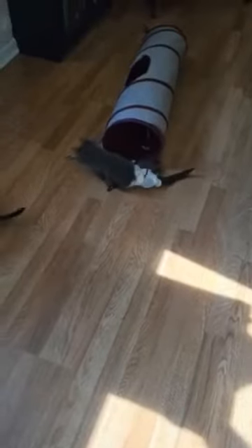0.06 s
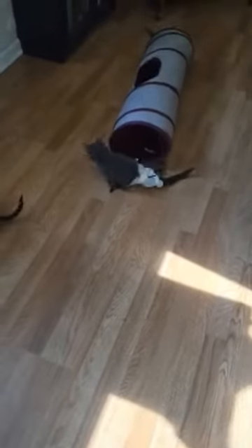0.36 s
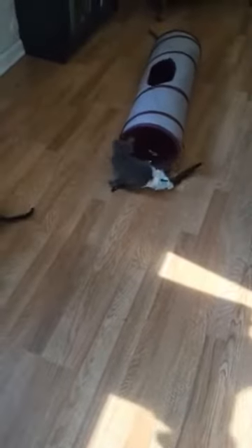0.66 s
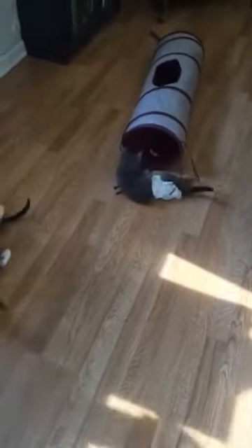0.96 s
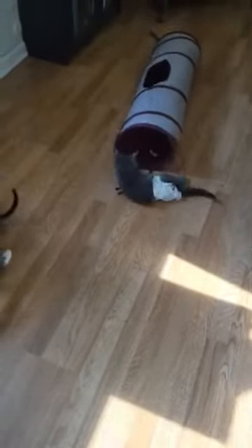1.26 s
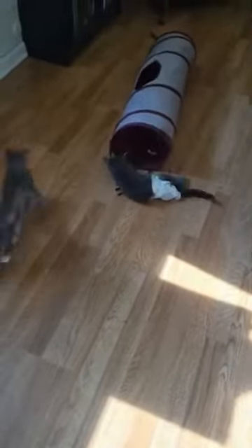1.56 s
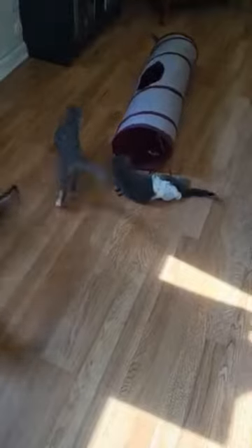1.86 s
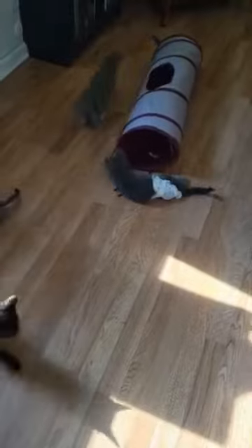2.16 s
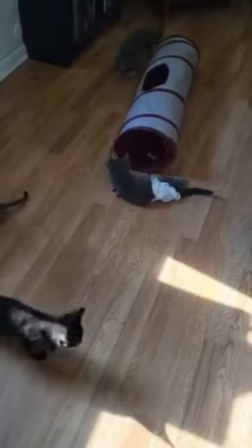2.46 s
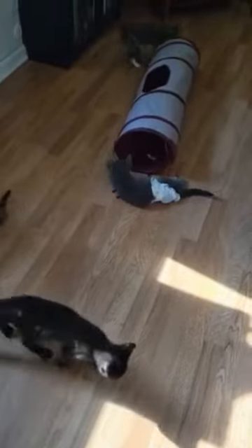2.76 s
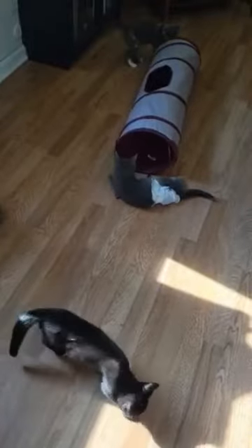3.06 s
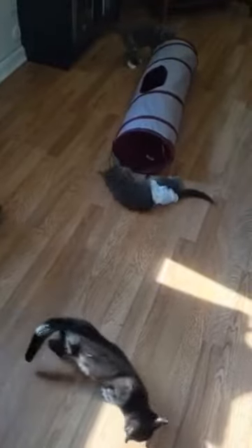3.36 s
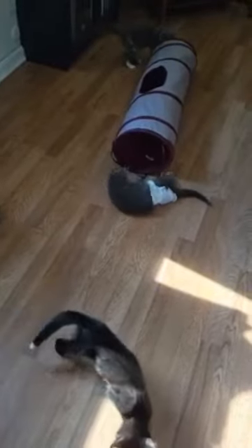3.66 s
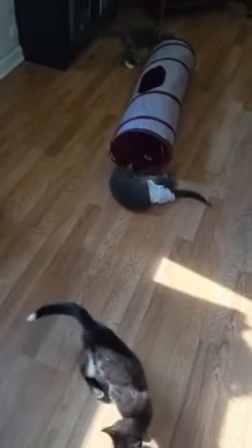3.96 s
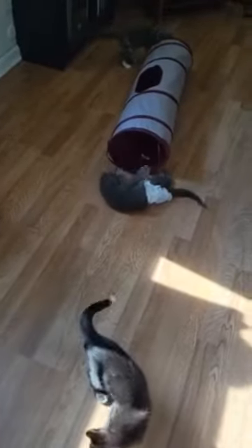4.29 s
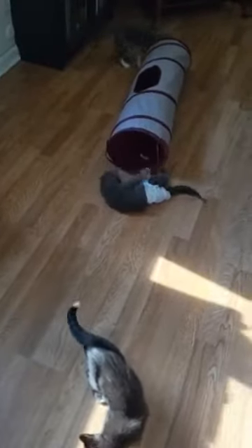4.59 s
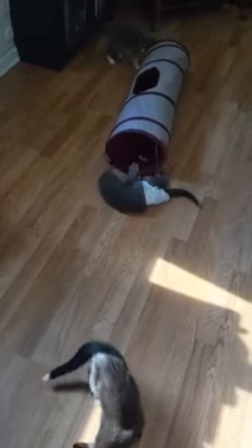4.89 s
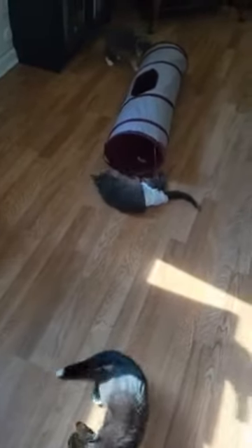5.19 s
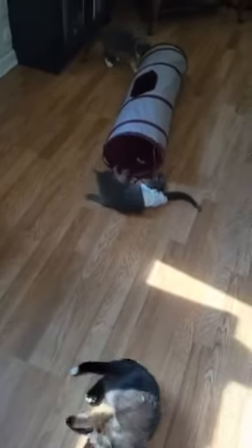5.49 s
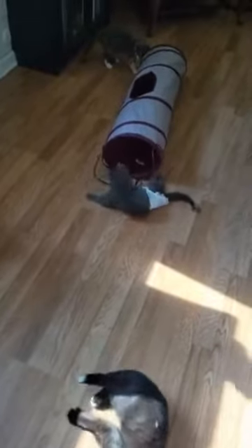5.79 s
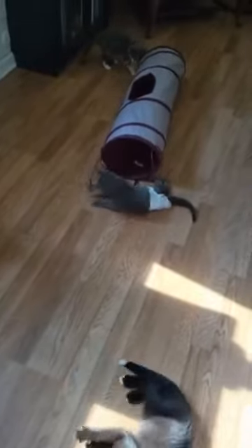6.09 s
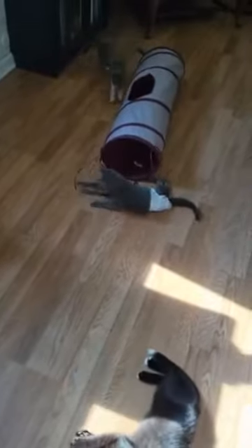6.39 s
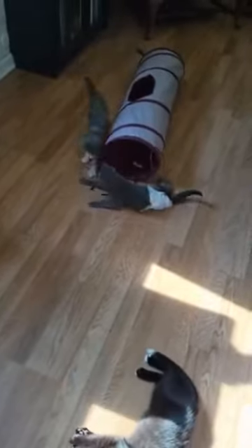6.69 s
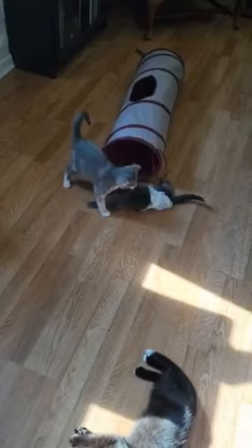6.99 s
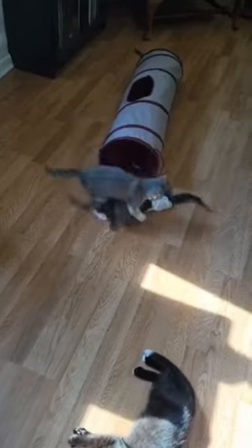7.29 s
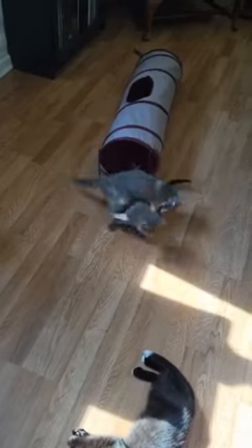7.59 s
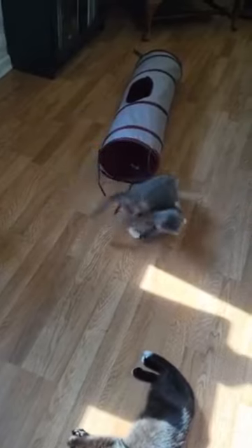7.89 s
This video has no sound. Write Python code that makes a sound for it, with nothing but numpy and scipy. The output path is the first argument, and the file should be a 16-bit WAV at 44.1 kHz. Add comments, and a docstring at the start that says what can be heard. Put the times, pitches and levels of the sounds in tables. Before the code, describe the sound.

Kittens play on a bare wooden floor beside a fabric tunnel, heard close through a phone in a quiet living room. It opens with a faint rustle and a few light taps. From about 0.8 to 1.8 seconds, paws scamper in a cluster of hollow thumps, with a brief deep rumble at 1 second and the loudest knock near 1.3. Softer, scattered steps follow, with one firmer thud just after 3 seconds. From about 3.5 to 6 seconds, small sharp claw ticks and short scrapes of fur and fabric take over, busiest around 5 seconds. Paw thumps return at 6.2 and build into a pattering scuffle from 6.5 to 7.5, with a crisp claw snap near 6.7 and more scratching, then ease to faint rustling by 8 seconds. Each contact has a short room reverberation, over a faint steady hum and hiss.

```python
"""A faint rustle, then small paws on bare boards: kittens at play beside a fabric tunnel in a quiet
living room, close to a hand-held phone. Toes tap and ring the wooden floor and the body's weight follows
with a thump. Claws drag and snap free; fur and fabric scrape in tiny catches of friction.
The room answers the contacts briefly, over a low steady hum and hiss."""
import sys
import numpy as np
from scipy import signal
from scipy.fft import rfft, irfft, next_fast_len
from scipy.io import wavfile
from scipy.ndimage import map_coordinates

SR = 44100
rng = np.random.default_rng(int(sys.argv[2]) if len(sys.argv) > 2 else 0)


def wrap_up_sound(samples):
    """Save the sound to the file named by the first command line argument, as 16-bit audio."""
    columns = np.atleast_2d(samples).T
    # keep every value between -1 and 1, then stretch to whole-number steps
    tamed = np.clip(columns, -1, 1)
    steps = np.round(tamed * 32767).astype(np.int16)
    wavfile.write(sys.argv[1], SR, steps)


N = 350506
SPAN = 24000  # samples given to one contact and its decay
AGE = np.arange(SPAN) / SR
TOP_HZ = 13800  # the phone's band limit

# The colour of rubbed fur and fabric. Each row: frequency in Hz, gain in dB.
FUR_COLOUR = [(150, 13), (500, 11.5), (1200, -0.5), (2000, 2.5), (2600, -0.5), (3600, 0), (5000, -1.5),
              (6800, 1), (8200, -14), (10000, -26), (12500, -15), (14000, -60)]
# The body, middle and air of a tick or scrape. Each row: lower and upper edge in Hz.
TREBLE_BANDS = [(700, 2800), (2800, 8000), (8000, 12500)]


def amp(db):
    return 10 ** (np.asarray(db) / 20)


def unit(x):
    return x / np.sqrt(np.mean(x ** 2) + 1e-20)


def freqs(x):
    return np.fft.rfftfreq(x.shape[-1], 1 / SR)


def along(points, hz):
    """Read a curve of (Hz, value) points on a log frequency axis."""
    knots_hz, values = np.transpose(points)
    return np.interp(np.log(hz + 1), np.log(knots_hz + 1), values)


def coloured(x, points):
    """Causal filter with the gain of (Hz, dB) points."""
    n = x.shape[-1]
    cepstrum = irfft(np.log(amp(along(points, freqs(x)))), n)
    cepstrum[1:n // 2] *= 2
    cepstrum[n // 2 + 1:] = 0
    return irfft(rfft(x) * np.exp(rfft(cepstrum)), n)


def wobble(rate):
    """A smooth random curve, rate knots a second."""
    return map_coordinates(rng.standard_normal(int(N * rate / SR) + 4), [np.arange(N) * rate / SR])


def add(track, start, sound):
    part = track[:, max(round(start * SR), 0):][:, :SPAN]
    part += sound[:, :part.shape[1]]


def diffuse(pair, null_hz=1150, likeness=0.84):
    """Sound from all sides: alike at the two microphones only in the bass."""
    turn = np.arccos(np.clip(likeness, 0, 1) * np.sinc(freqs(pair) / null_hz)) / 2
    mid, side = irfft(rfft(pair) * [np.cos(turn), np.sin(turn)], pair.shape[-1])
    return np.array([mid + side, mid - side])


def still_room(air_db=-67):
    """Room tone: even hiss and rumble from all round, with a slightly unsteady hum."""
    # The colour of the room tone. Each row: frequency in Hz, gain in dB.
    air_colour = [(12, -34), (22, -18.5), (66, 5), (140, -9.5), (325, -15), (700, -35), (1100, -28.5),
                  (1800, -23.5), (3300, -32.5), (6600, -22.5), (8200, -32), (9500, -55), (13500, -41.5)]
    # The tones of the hum. Each row: frequency in Hz, rms level in dB.
    hum_tones = [(59.2, -71.5), (775.2, -94.5)]
    air = unit(diffuse(coloured(rng.standard_normal((2, N)), air_colour)))
    t = np.arange(N) / SR
    hum = np.zeros(N)
    for hz, db in hum_tones:
        peak = np.sqrt(2) * amp(db + 0.94 * wobble(3.2))
        hum += peak * np.sin(2 * np.pi * hz * t + 0.52 * wobble(2.7))
    return amp(air_db) * air + hum


def room_tail(x, wet_db, first_wall_s=0.004):
    """The living room's short reverberation, different from every spot on the floor."""
    # The room's decay. Each row: frequency in Hz, seconds to fall 60 dB.
    decay_times = [(80, 0.24), (260, 0.47), (700, 0.21), (1900, 0.24), (5000, 0.29), (12000, 0.15)]
    hz, t, spectra = signal.stft(rng.standard_normal((2, SPAN)), SR, nperseg=256)
    decay = amp(-60 * t / along(decay_times, hz)[:, None])
    tail = signal.istft(spectra * decay, SR, nperseg=256)[1][:, :SPAN]
    tail = diffuse(tail) * (1 - np.exp(-(AGE / first_wall_s) ** 2))
    tail = amp(wet_db) * tail / np.linalg.norm(tail[0])
    return signal.fftconvolve(x[None], tail, axes=1)[:, :len(x)]


def round_casing(x, swing_rad=1.15, swing_hz=1800):
    """The phone's casing scatters close treble, giving it a different phase at each microphone."""
    hz = freqs(x)
    knots = rng.standard_normal((2, int(hz[-1] / swing_hz) + 4))
    phase = np.array([map_coordinates(k, [hz / swing_hz]) for k in knots])
    return irfft(rfft(x) * np.exp(1j * swing_rad * phase * np.minimum(hz / swing_hz, 1)), len(x))


def in_room(x, wet_db):
    """A small bright sound near the phone, with the room's answer."""
    return round_casing(x) + room_tail(x, wet_db)


def grit(size, rate, spread_db, hiss, life_s, grain_samples=256):
    """Friction: tiny uneven catches, rate a second, each ringing at its own pitch over a smooth hiss."""
    when, pitch, chance = rng.random((int(rate * size / SR), 3)).T[:, :, None]
    t = np.arange(grain_samples) / SR
    strengths = amp(spread_db * np.minimum(-np.log1p(-chance), 4))
    grains = strengths * np.exp(-t / life_s) * np.sin(2 * np.pi * pitch * TOP_HZ * t)
    places = (when * size).astype(int) + np.arange(grain_samples)
    catches = np.bincount(places.ravel(), grains.ravel(), size)[:size]
    return unit(catches) + hiss * rng.standard_normal(size)


def uneven(x, knots=24):
    """Every spot of wood or taut fabric colours the sound by a dB or so."""
    hz = np.geomspace(TREBLE_BANDS[0][0], TOP_HZ, knots)
    return coloured(x, np.column_stack([hz, rng.standard_normal(knots)]))


def fidget(trim_db=-4, patches=4):
    """Restless kittens: several patches of fur and fabric rustle at once, each with its own colour."""
    # The rise and fall of the rustle. Each row: time in seconds, relative level in dB.
    restlessness = [(0.0, -73.5), (0.33, -65), (1.0, -61), (1.55, -73), (3.429, -72.5), (3.61, -66.5),
                    (4.34, -75), (4.58, -62), (4.98, -58), (5.18, -64.5), (6.49, -71), (6.77, -61.5),
                    (7.22, -68.5), (7.35, -65), (7.95, -65.5)]
    level_db = np.interp(np.arange(N) / SR, *np.transpose(restlessness))
    rustle = np.zeros(N)
    for _ in range(patches):
        scratches = grit(next_fast_len(N), rate=50, spread_db=2.3, hiss=0.55, life_s=0.0002)
        rustle += unit(uneven(coloured(scratches, FUR_COLOUR))[:N])
    return in_room(unit(rustle) * amp(level_db + trim_db), wet_db=1.5)


def to_the_left(x, lead_s=0.00054, shared_hz=150):
    """A low sound reaches the left microphone a little earlier; deep bass is the same at both."""
    hz = freqs(x)
    lag_cycles = np.outer([0, lead_s], hz ** 2 / (hz + shared_hz))
    return irfft(rfft(x) * np.exp(-2j * np.pi * lag_cycles), len(x))


def voiced(x, bands, levels_db, opening_s):
    """Give a contact its own rms level in each band over its opening moments."""
    out = np.zeros_like(x)
    for band, db in zip(bands, levels_db):
        part = signal.sosfilt(signal.butter(3, band, "bandpass", fs=SR, output="sos"), x)
        out += amp(db) * part / np.sqrt(np.mean(part[:, :int(opening_s * SR)] ** 2) + 1e-20)
    return out


def paws(tap_hz=740, tap_s=0.0012, weight_delay_s=0.019, spot_t60=0.042, slap_s=0.0092, slack_hz=158):
    """Toes tap and ring the floor, then weight presses the board; a softer landing swells more slowly."""
    # Paws and bodies landing. Each row: start in seconds, pitch of the struck spot in Hz,
    # level of the thud in dB, hardness (knock over thud) in dB.
    landings = [(0.036, 286, -62, 6.5), (0.239, 189, -53.5, -22), (0.318, 157, -61.5, -28),
                (0.377, 121, -59, 2), (0.493, 297, -59.5, 6.5), (0.566, 235.5, -55, 2),
                (0.599, 288, -53.5, -28), (0.649, 249, -55, 2), (0.714, 262, -57.5, -1.5),
                (0.815, 205, -40, -12), (0.853, 202.6, -42, -6.5), (0.957, 138.4, -46, -13),
                (1.12, 148, -51.5, -13), (1.23, 269, -45, -9), (1.261, 239, -33.5, 3.5),
                (1.309, 261, -40.5, -17), (1.363, 193, -44, 5), (1.407, 188, -53.5, 3),
                (1.585, 185.5, -46, -16), (1.775, 217, -45, -2.5), (2.1, 140, -55, -10.5),
                (2.224, 212, -55.5, -8), (2.296, 162, -57.5, -12), (2.481, 176, -55.5, -13),
                (2.865, 198, -58, -6), (3.134, 206, -41.5, -13.5), (3.631, 266, -71.5, 12.5),
                (4.559, 189, -74, -7), (4.666, 300, -70.5, 20.5), (4.796, 262, -67, 11),
                (4.927, 173, -61.5, 5), (5.046, 189, -59, 9), (5.244, 350, -67.5, 17),
                (6.187, 214, -51, -8), (6.535, 174, -51, -9.5), (6.636, 286, -44.5, -1.5),
                (6.692, 205.4, -42, -2), (6.763, 264, -60.5, 12), (6.813, 169, -51, 1.5),
                (6.922, 180, -48.5, -3.5), (7.155, 180, -51.5, -9), (7.281, 214, -45, 1),
                (7.401, 245, -57.5, 1), (7.443, 283, -53, 7), (7.46, 257, -59, 2), (7.515, 191, -52, -10)]
    # The modes of the whole floor. Each row: frequency in Hz, relative level in dB, seconds to fall 60 dB.
    floor_modes = [(65.2, -1, 0.18), (79, -6, 0.29), (151, 0.5, 0.28), (198, 7, 0.34), (271.7, -6.5, 0.38),
                   (327.3, 2.5, 0.14), (401, -3.5, 0.15), (554, 0.5, 0.06), (608, -4, 0.048),
                   (675.5, -1, 0.056), (719, 0, 0.12), (857, -12, 0.039), (987, -15.5, 0.033),
                   (1088, -16, 0.058)]
    # The colour of a pad's dull slap. Each row: frequency in Hz, gain in dB.
    slap_colour = [(30, -24), (70, -6.5), (260, 10), (430, -5), (560, -9.5), (800, -7), (1100, -14.5),
                   (2500, -19.5), (8000, -70)]
    # The boom, thud and knock of a landing. Each row: lower and upper edge in Hz.
    thump_bands = [(40, 115), (120, 335), (450, 1250)]
    out = np.zeros((2, N))
    mode_hz, mode_db, mode_t60 = np.transpose(floor_modes)[:, :, None]
    tap = np.exp(-AGE / tap_s) * np.sin(2 * np.pi * tap_hz * AGE)
    late = AGE - weight_delay_s
    weight = np.where(late < 0, np.exp(-(late / 0.01) ** 2), amp(-60 * abs(late) / spot_t60))
    for start, spot_hz, thud_db, hardness_db in landings:
        boom_db = thud_db - 2 - 3.5 * np.log2(spot_hz / slack_hz)  # a slack, low spot booms most
        knock_db = thud_db + hardness_db
        strength, detune = rng.standard_normal((2, len(floor_modes), 1))  # each spot rings differently
        decays = amp(mode_db + 2.5 * strength - 60 * AGE / mode_t60)
        ring = np.sum(decays * np.sin(2 * np.pi * mode_hz * (1 + 0.0076 * detune) * AGE), axis=0)
        spot = weight * np.sin(2 * np.pi * spot_hz * AGE)
        slap = coloured(rng.standard_normal(SPAN) * np.exp(-AGE / slap_s), slap_colour)
        softness_db = np.clip(-hardness_db, -12, 12)  # a soft pad rings little but the struck board
        swell = 1 - np.exp(-AGE / (0.00082 * amp(softness_db)))
        blow = swell * (unit(ring) + amp(5 + softness_db / 2) * unit(spot) + amp(-2) * unit(slap))
        heard = to_the_left(blow) + room_tail(blow, wet_db=-5)
        thump = voiced(heard, thump_bands, (boom_db, thud_db, knock_db), opening_s=0.03)
        add(out, start, thump + to_the_left(amp(knock_db + 9) * tap * swell))
    return out


def registers(strength_db, brightness_db):
    """Body, middle and air of a tick or scrape in dB: a brighter one trades body for air."""
    return strength_db - brightness_db, strength_db, strength_db - 13 + 0.7 * brightness_db


def ringing(x, hz, peak_db=6, half_width_octaves=0.35):
    """A plucked or rubbed spot has a colour of its own and one broad resonance."""
    edge = 2 ** half_width_octaves
    return coloured(uneven(x), [(hz / edge, 0), (hz, peak_db), (hz * edge, 0)])


def claw_ticks(lead_in_s=0.012, drag_db=-18, drag_s=0.007, contact_s=0.0058, sharp_db=-55.5, right_db=1):
    """A claw, a little to the right, drags, snaps free and chatters on; a strong snap also cracks."""
    # Claws leaving wood and fabric. Each row: time of the snap in seconds, relative strength in dB,
    # brightness in dB, reverberation against the direct sound in dB, pitch of the plucked spot in Hz.
    snaps = [(0.037, -49, 13, 0.5, 5400), (0.496, -69.5, -10, -15, 2300), (0.573, -61, 16.5, -2.5, 6870),
             (0.789, -54.5, -1.5, 9, 3500), (1.058, -54, 6, 4, 3130), (1.245, -64, -6, -5.5, 1990),
             (1.37, -53.5, 7, -4, 4800), (2.155, -71, 0, 1, 1970), (2.491, -73.5, 3, 2, 2370),
             (2.612, -80.5, -6.5, -8, 2350), (2.675, -81, 10, -20, 6640), (2.822, -83, 21, -14, 6700),
             (3.636, -48.5, 15, 2, 6300), (3.884, -64, -3.5, 0, 3800), (3.897, -48, 3, 2.5, 4200),
             (4.352, -47, 4.5, 0.5, 4500), (4.612, -66.5, -0.5, 0, 1810), (4.656, -65, -3, 1, 1800),
             (4.68, -65.5, -10.5, -13, 2080), (4.798, -58.5, -3, 8, 4200), (4.812, -58, -1, -6, 1720),
             (4.824, -62, -11.5, -1, 1770), (4.843, -59, -1, -20, 4000), (4.965, -44.5, 12.5, 3, 6550),
             (5.006, -51.5, 4, 4, 5400), (5.059, -52.5, -2, -4, 2750), (5.21, -61.5, -9, -19, 2070),
             (5.226, -66, -6, -17, 2100), (5.241, -72, -6, -24, 2100), (5.448, -63, 2.5, 3, 1970),
             (5.492, -66.5, 1, -9, 4250), (5.557, -72.5, -6.5, -11, 4040), (5.566, -64, 2, -23, 4080),
             (6.023, -55.5, 13.5, -0.5, 4870), (6.167, -73, -14, 4.5, 1730), (6.18, -52.5, 11, -1, 4220),
             (6.362, -77, -3.5, -1, 2800), (6.462, -70, 1, 4.5, 1760), (6.69, -38, 9, -2.5, 5050),
             (6.802, -55, 4.5, -6, 5490), (6.918, -50.5, 3, -9, 4340), (7.125, -67.5, -1.5, -10, 2180),
             (7.211, -68, -2, -4, 2000), (7.291, -47, -1, -4.5, 4200), (7.309, -60, -1, -18, 2770),
             (7.374, -61, 0, -2, 1720), (7.403, -56, -1.5, -5, 3500), (7.426, -59, -7, -11, 5200),
             (7.436, -49, 4, -11, 5000), (7.445, -63, -10, -4, 1460), (7.506, -63, -2.5, -11, 1650),
             (7.583, -72, 2, -6, 1770), (7.639, -68, -5, -9, 1760), (7.9, -72.5, 1, -6, 4490)]
    # The colour of a claw's tick. Each row: frequency in Hz, gain in dB.
    claw_colour = [(300, 9.5), (800, -3), (1300, -7), (1900, 1.5), (2600, -2.5), (3600, 8), (5000, 12),
                   (6500, 6), (8200, -17), (10000, -26), (12200, -18), (14000, -36.5)]
    # The colour of the thin crack. Each row: frequency in Hz, gain in dB.
    crack_colour = [(2500, -40), (5500, -2), (8700, -1), (13000, -21)]
    out = np.zeros((2, N))
    t = AGE - lead_in_s
    release = signal.unit_impulse(SPAN, round(lead_in_s * SR))
    crack = coloured(release, crack_colour)
    for snap_s, strength_db, brightness_db, wet_db, hz in snaps:
        excess_db = strength_db - sharp_db
        length = contact_s / 2 ** (max(excess_db, 0) / 14)  # a strong pull lets go sooner
        envelope = np.where(t < 0, amp(drag_db) * np.exp(-abs(t) / drag_s), np.exp(-1.5 * abs(t) / length))
        chatter = envelope * grit(SPAN, rate=3000, spread_db=2.2, hiss=0.6, life_s=0.00015)
        chatter *= length / 0.003 / np.linalg.norm(chatter)  # a shorter contact chatters less
        heard = in_room(ringing(coloured(release + chatter, claw_colour), hz), wet_db)
        tick = voiced(heard, TREBLE_BANDS, registers(strength_db, brightness_db), opening_s=0.12)
        add(out, snap_s - lead_in_s, tick + amp(-47 + 1.9 * excess_db) * round_casing(crack))
    return out * amp([[-right_db / 2], [right_db / 2]])


def scrapes(attack_s=0.0024):
    """A paw or flank slides: crackling friction swells and stops with the stroke."""
    # Sliding strokes. Each row: start in seconds, length in seconds, relative strength in dB,
    # brightness in dB, pitch of the rubbed spot in Hz.
    strokes = [(0.216, 0.047, -62.5, 13.5, 6160), (0.49, 0.042, -46.5, 2, 2290),
               (0.729, 0.043, -58, -5, 2440), (0.778, 0.046, -52, -0.5, 2900),
               (0.863, 0.15, -60.5, 3.5, 3730), (0.889, 0.048, -58.5, -6.5, 1820),
               (1.039, 0.021, -54, -3, 3030), (1.227, 0.053, -56, -3, 2130),
               (1.976, 0.08, -66.5, 0.5, 1840), (2.054, 0.15, -62, 3, 2730), (3.071, 0.08, -53.5, 10, 5170),
               (3.425, 0.061, -65.5, 16, 6400), (3.654, 0.032, -55.5, -2.5, 1830),
               (4.54, 0.023, -67, -9, 1820), (4.794, 0.044, -46, 3, 1740), (4.925, 0.023, -55.5, -2, 1700),
               (5.218, 0.019, -60, -5, 1770), (5.358, 0.3, -62.5, -0.5, 4280),
               (5.754, 0.11, -53.5, 6, 5950), (6.186, 0.056, -63, 24, 4140), (6.758, 0.027, -45, 6.5, 4190),
               (7.279, 0.02, -47.5, -11.5, 2800), (7.396, 0.0062, -43, 0.5, 3500),
               (7.444, 0.043, -48.5, 0, 3400)]
    out = np.zeros((2, N))
    for start, length, strength_db, brightness_db, hz in strokes:
        envelope = (1 - np.exp(-AGE / attack_s)) * np.exp(-(AGE / length) ** 4)
        catches = grit(SPAN, rate=1300, spread_db=3, hiss=0.35, life_s=0.0003)
        heard = in_room(ringing(coloured(envelope * catches, FUR_COLOUR), hz), wet_db=-3)
        add(out, start, voiced(heard, TREBLE_BANDS, registers(strength_db, brightness_db), length))
    return out


def deep_boom(start_s=0.97, length_s=0.22, hz=35, db=-44):
    """A few slow cycles of deep rumble as a kitten pushes off."""
    progress = np.clip((np.arange(N) / SR - start_s) / length_s, 0, 1)
    return amp(db) * np.sin(np.pi * progress) * np.sin(2 * np.pi * hz * length_s * progress)


def scene(tick_db=-0.5, scrape_db=-5):
    """Paws, claws and fur close by, over the room tone."""
    contacts = paws() + amp(tick_db) * claw_ticks() + amp(scrape_db) * scrapes()
    return contacts + fidget() + deep_boom() + still_room()


def record(dry):
    """The phone's two microphones differ in colour, and the treble ends steeply at its band limit."""
    # The balance of the microphones. Each row: frequency in Hz, left minus right in dB.
    mic_balance = [(100, -0.2), (500, -4), (1100, 1), (2200, -0.5), (5000, -2.5), (8500, 3.5),
                   (12000, -5.5)]
    padded = np.pad(dry, ((0, 0), (0, next_fast_len(N + SPAN) - N)))
    hz = freqs(padded)
    mic_gains = amp(np.outer([0.5, -0.5], along(mic_balance, hz)))
    band_limit = 1 / (1 + (hz / TOP_HZ) ** 80)
    return irfft(rfft(padded) * mic_gains * band_limit, padded.shape[-1])[:, :N]


dry = scene()
out = record(dry)
wrap_up_sound(out)
```